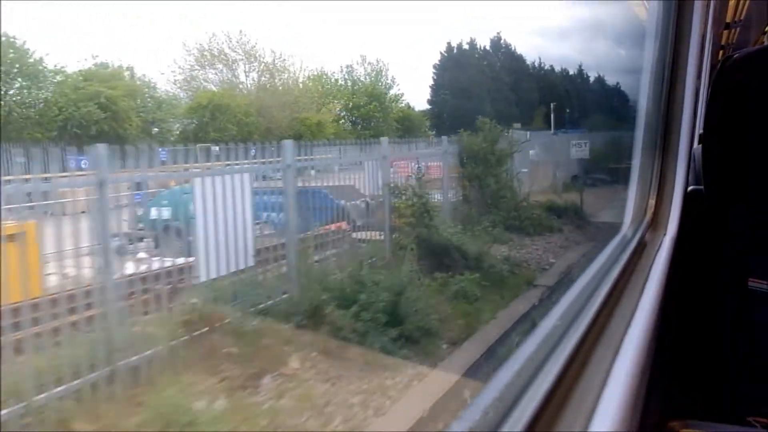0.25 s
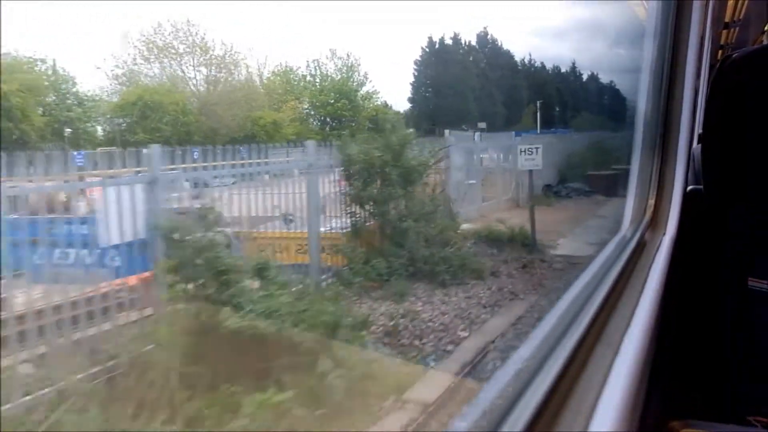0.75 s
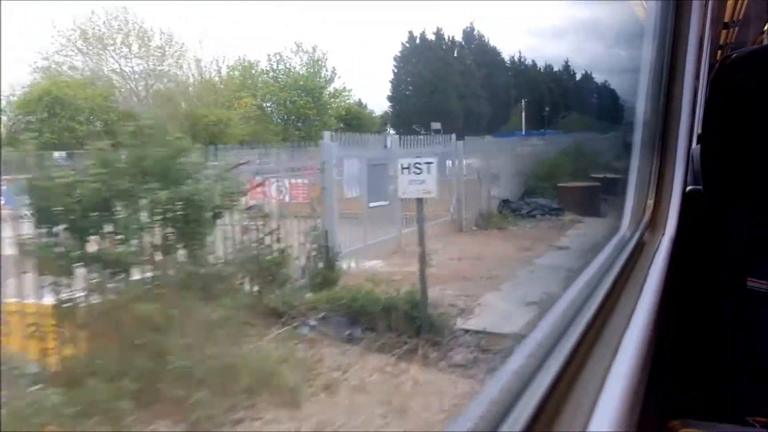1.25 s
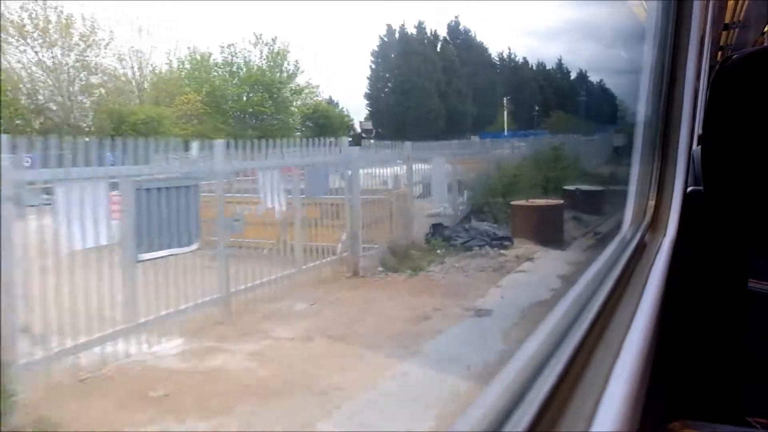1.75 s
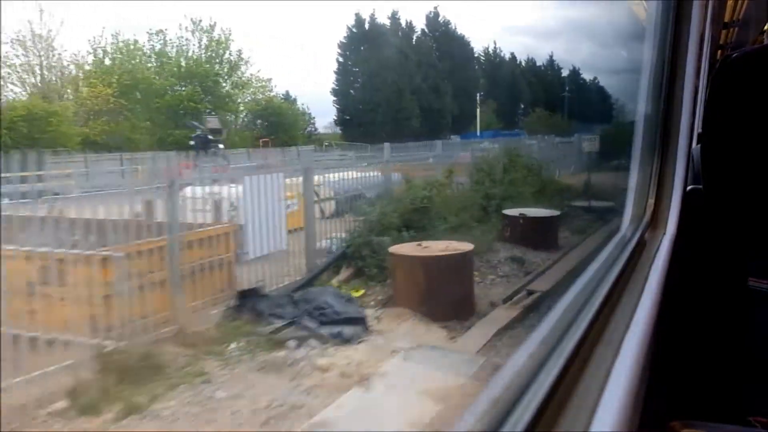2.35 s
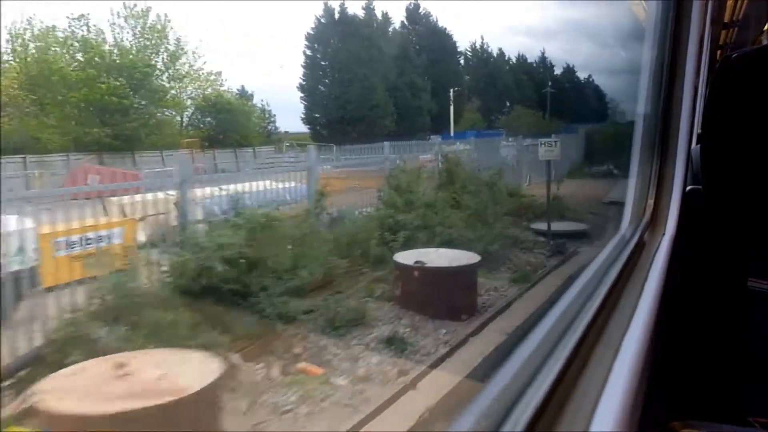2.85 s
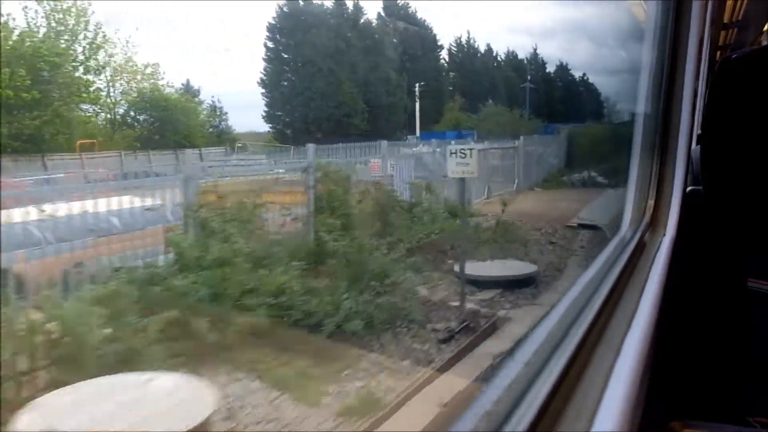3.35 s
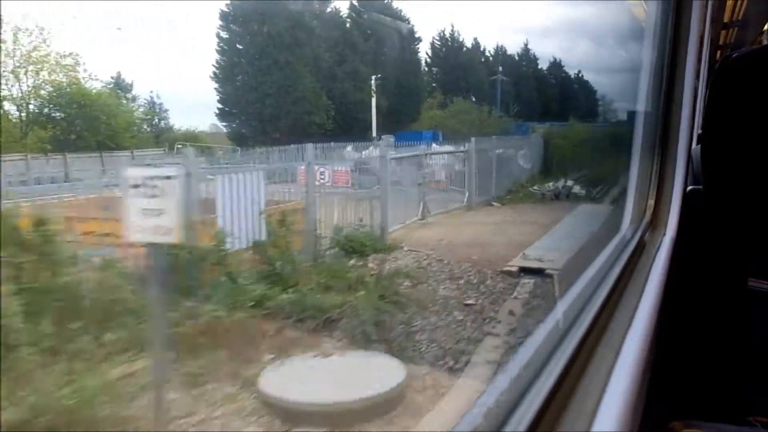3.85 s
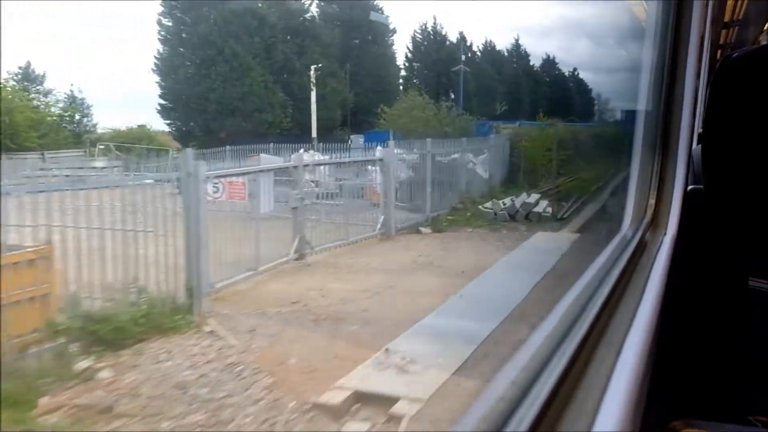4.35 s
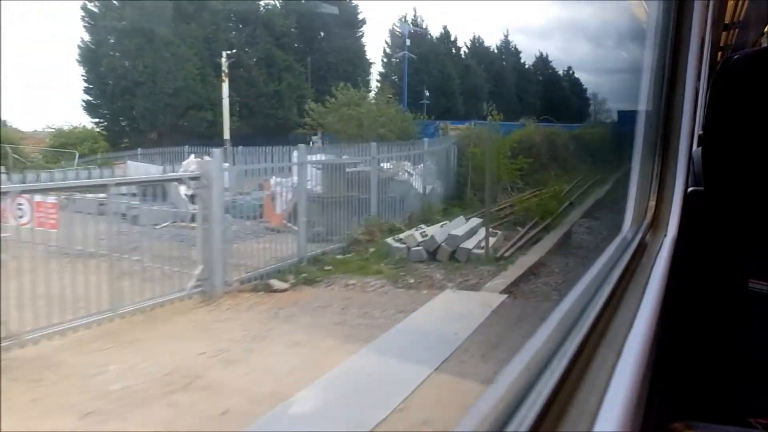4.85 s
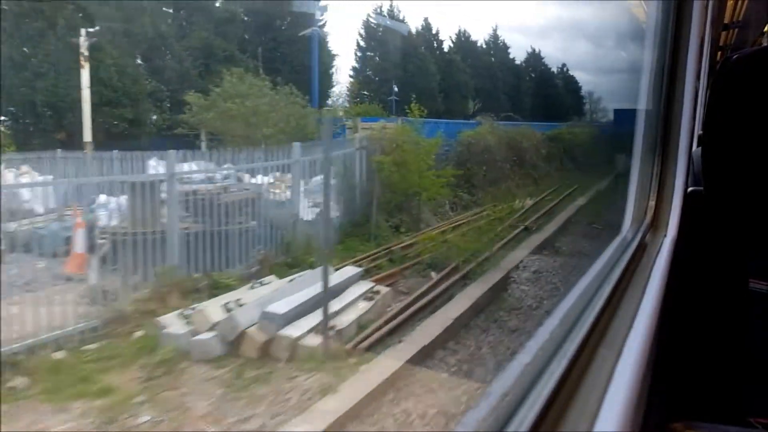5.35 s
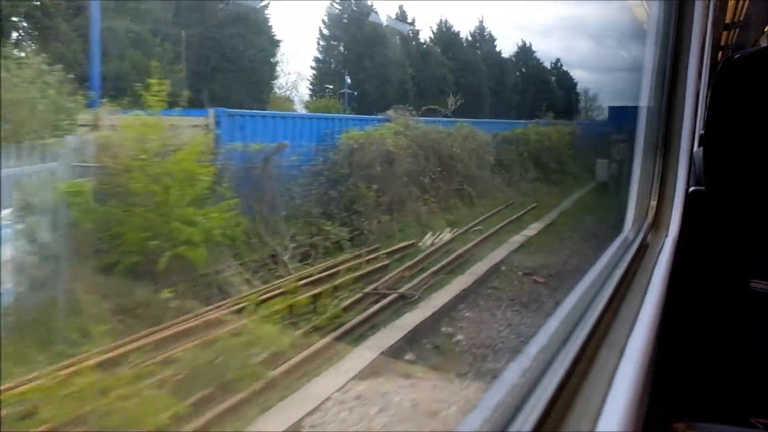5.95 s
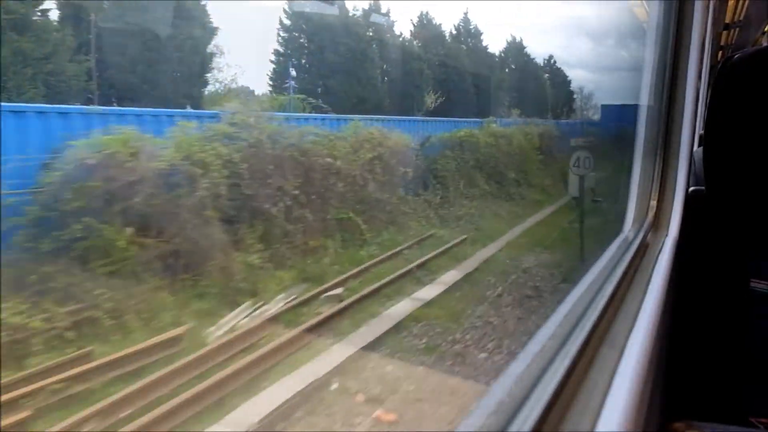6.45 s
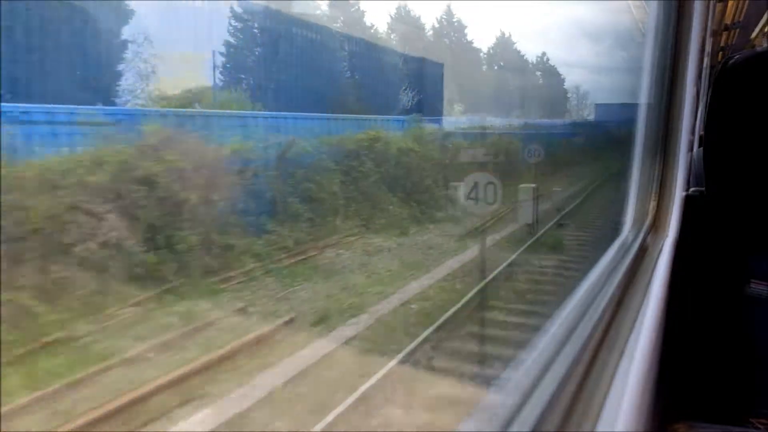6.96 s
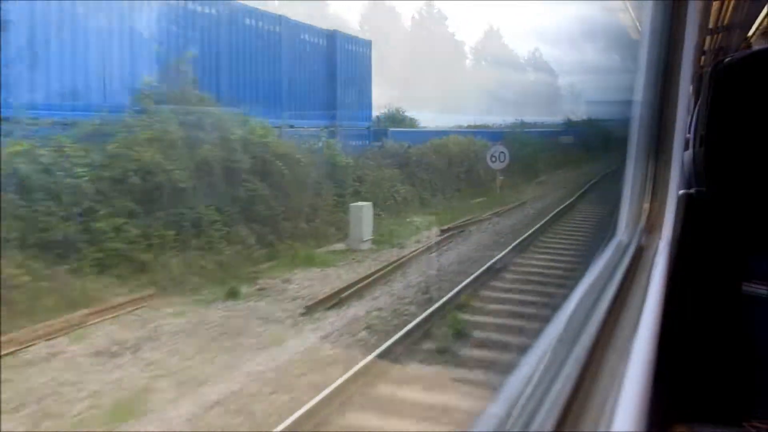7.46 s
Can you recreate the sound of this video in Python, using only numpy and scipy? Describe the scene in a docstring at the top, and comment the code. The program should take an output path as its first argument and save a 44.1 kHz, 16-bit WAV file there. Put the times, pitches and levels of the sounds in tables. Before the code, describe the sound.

Dense, bass-heavy cabin noise: a diesel engine under the floor thumps rapidly and hums, mixed with continuous wheel-and-rail roar. The boom beats at first, then steadies while light panel rattles and buzzes come and go. Faint high wheel singing and tiny ticks appear past the middle. Near the end comes a dry click and an abrupt rise in engine, rumble, rattles and thuds, heard from inside the carriage.

```python
"""Inside a diesel railcar at speed. From the start a six-cylinder engine under the floor thumps and drones as
summed tones, with a boom that beats at first; shaped noise makes the wheel rumble, and a gear whine climbs.
Loose trim buzzes and panels rattle in noise bursts; later a wheel sings faintly and small fittings tick.
Near the end, with a sharp click, the sound steps to a louder stretch of the ride with more thuds and ticks."""
import sys
import numpy as np
from scipy import signal
from scipy.fft import rfft, irfft
from scipy.io import wavfile

SR = 44100
rng = np.random.default_rng(int(sys.argv[2]) if len(sys.argv) > 2 else 0)


def store_wav(level_fs):
    """Save 16-bit WAV to argv[1]."""
    pcm = np.round(np.clip(np.atleast_2d(level_fs), -1, 1) * 32767)
    wavfile.write(sys.argv[1], SR, pcm.T.astype(np.int16))


N = 339570
T = np.arange(N) / SR
BINS = np.fft.rfftfreq(N, 1 / SR)
STEP_S = 6.304  # the loud stretch starts here
LOUD = np.clip((T - STEP_S) / .004, 0, 1)  # 0 in the quiet stretch, 1 in the loud one


def amp(db):
    """Turns decibels into a gain."""
    return 10 ** (np.asarray(db) / 20)


def unit(x):
    """Scales a signal to rms 1."""
    return x / np.sqrt(np.mean(x ** 2) + 1e-20)


def sine(turns):
    """A sine wave of rms 1 from a count of turns."""
    return np.sqrt(2) * np.sin(2 * np.pi * turns)


def curves(rows):
    """Draws each column of a table as a curve in time."""
    s, *columns = np.transpose(rows)
    return [np.interp(T, s, column) for column in columns]


def spectra(rows, hz):
    """Draws each column of a table along a log-frequency axis."""
    f, *columns = np.transpose(rows)
    return [np.interp(np.log(hz + 1), np.log(f + 1), column) for column in columns]


def drift(rate_hz, size=8192):
    """Slow random wander of rms 1."""
    a, b = rng.standard_normal((2, size))
    return unit(irfft((a + 1j * b) / (1 + (BINS[:size] / rate_hz) ** 4), N))


def band(hz, width_hz):
    """Noise gathered around one frequency, rms 1."""
    noise = rfft(rng.standard_normal(N))
    return unit(irfft(noise / (1 + (2 * (BINS - hz) / width_hz) ** 2), N))


def resonance(hz, centre_hz, width_hz):
    """Gain of one resonance, 1 at its centre."""
    return 1 / np.sqrt(1 + (2 * (hz - centre_hz) / width_hz) ** 2)


def soft_pulse(t, rise_s):
    """A bump that rises to 1 at rise_s, then dies away."""
    return t / rise_s * np.exp(1 - t / rise_s)


def add(mix, s, sound):
    """Mixes a sound in at time s."""
    part = mix[max(round(s * SR), 0):][:len(sound)]
    part += sound[:len(part)]


# engine cycles, one every two crank turns, sagging slowly under load: (t/s, f/Hz)
ENGINE_SPEED = [(0, 14.674), (4.1, 14.61), (6.3, 14.602), (6.35, 14.575), (7.7, 14.575)]
THUMP_S, LOUD_THUMP_S = .0411, 6.3487  # first thump of the quiet and of the loud stretch


def engine_cycles():
    """Counts engine cycles, turning a little unevenly; each thump falls on a whole number."""
    unsteady = (.0003 + .0009 * LOUD) * drift(7.)
    cycles = np.cumsum(curves(ENGINE_SPEED)[0] * (1 + unsteady)) / SR
    cycles = cycles - np.interp(THUMP_S, T, cycles)
    # the beat shifts at the step
    return cycles - (T >= STEP_S) * (np.interp(LOUD_THUMP_S, T, cycles) % 1)


# the firing tone and its harmonics: (t/s, order 6 level/dB, order 12 level/dB, order 18 level/dB)
FIRING_TONES = [(0, -31, -32, -25), (1.5, -31.5, -29.5, -26), (3, -32, -32, -27.5),
                (5.1, -31.5, -30.5, -26.5), (6.29, -32.5, -36.5, -26), (6.315, -29.5, -27, -22),
                (6.85, -29.5, -33.5, -17.5), (7.1, -26.5, -40.5, -20), (7.7, -26.5, -54, -22.5)]
# the boom, order 18, swells or dips briefly: (t/s, change of level/dB)
BOOM_CHANGES = [(.49, -0.5), (1.159, -1), (1.39, 3.5), (1.73, 5), (3.43, 6), (3.64, 3.5), (4.12, 5),
                (4.37, 0.5), (5.15, -8.5), (5.66, -10), (5.82, 5), (6.15, -4), (6.33, 2.5), (6.45, 3.5),
                (7.05, -7), (7.51, -7.5)]
SURGE_S = 0.03
# the boom throbs once a cycle, cresting shortly before the thump: depth (dB), place in the cycle (0-1)
THROB_DB, THROB_AT = 2.8, .78
# a weaker tone just above order 18 makes the boom beat, then fades
BEAT_HZ, BEAT_PEAK_S, BEAT_DB, BEAT_FADE_S = 7.2, .41, -34, 1


def engine_drone(cycles, flutter_db=0.46):
    """Six firings a cycle: the firing tone, its octave and the booming, beating third harmonic."""
    turns = [k * 6 * cycles + .08 * rng.standard_normal() for k in (1, 2, 3)]
    firing, octave, boom = curves(FIRING_TONES)
    boom = boom + THROB_DB * np.cos(2 * np.pi * (cycles - THROB_AT))
    boom = boom + sum(db * np.exp(-((T - s) / SURGE_S) ** 2) for s, db in BOOM_CHANGES)
    tones = sum(amp(db + flutter_db * drift(2.5)) * np.cos(2 * np.pi * turn)
                for turn, db in zip(turns, (firing, octave, boom)))
    beat_level = amp(BEAT_DB) / (1 + (T / BEAT_FADE_S) ** 8)
    beat = beat_level * np.cos(2 * np.pi * (turns[-1] + BEAT_HZ * (T - BEAT_PEAK_S)))
    return np.sqrt(2) * (tones + beat)


TIMING_ORDER = 56  # tone of the timing gears, in multiples of the engine cycle
# prominent engine orders: (multiple of the cycle, quiet level/dB, loud level/dB)
STRONG_ORDERS = [(2, -60, -44), (3, -48, -44), (4, -42, -37), (5, -49, -43), (7, -36, -30), (8, -44, -38),
                 (9, -40, -41), (10, -42, -37), (11, -53, -41), (13, -49, -53), (14, -46, -45),
                 (15, -38, -35), (16, -50, -47), (17, -53, -41), (19, -56, -52), (20, -42, -36),
                 (21, -41, -32), (22, -45, -47), (24, -43, -37), (26, -46, -45), (27, -55, -51),
                 (28, -38.5, -33), (29, -55, -51), (30, -54, -53), (31, -55, -53), (36, -57, -48),
                 (42, -50, -45), (50, -55, -54), (61, -48, -54), (63, -51, -44), (66, -65, -48),
                 (67, -58, -50), (70, -55, -49), (75, -52, -50), (86, -60, -57), (88, -53, -49),
                 (103, -57, -52), (106, -62, -58), (112, -63, -54), (124, -63, -58)]
# rough level of the other orders, before a 1 dB cut and random scatter: (f/Hz, quiet level/dB, loud level/dB)
OTHER_ORDERS = [(15, -80, -70), (360, -63, -52), (470, -55, -53), (650, -58, -58), (830, -60, -55),
                (980, -59, -56), (1180, -66, -62), (1350, -68, -62), (1600, -68, -61), (1850, -71, -65),
                (2300, -82, -78), (3000, -87, -85)]


def engine_orders(cycles, size=8192, count=210):
    """A pressure wave repeats every cycle and thumps; each order wavers on its own as the load changes."""
    k = np.arange(1, count + 1)
    hz = k * np.mean(np.array(ENGINE_SPEED)[:, 1])
    named = np.array(STRONG_ORDERS)
    levels_db = np.array(spectra(OTHER_ORDERS, hz)) + 1.7 * rng.standard_normal(count) - 1
    levels_db[:, named[:, 0].astype(int) - 1] = named[:, 1:].T
    # the drone and the timing gears have functions of their own
    levels = amp(levels_db) * ~np.isin(k, (6, 12, 18, TIMING_ORDER))
    # one cylinder thumps harder: low orders arrive nearly together, the body scatters the high ones
    thump = (.92 + (hz / 380) ** 2) * rng.standard_normal(count)
    slow, fast = 2 * np.pi * rng.random((2, count))
    place = cycles % 1 * size
    out = np.zeros(N)
    for weight, phases in ((.94, thump), (.24 * drift(1.), slow), (.22 * drift(4.), fast)):
        spectrum = np.pad(levels * np.exp(1j * phases), ((0, 0), (1, 0)))
        waves = irfft(spectrum, size) * size / np.sqrt(2)
        # read the one-cycle wave at the engine's place in its cycle
        quiet, loud = (np.interp(place, np.arange(size + 1), np.append(w, w[0])) for w in waves)
        out += weight * (quiet * (1 - LOUD) + loud * LOUD)
    return out


# song of the timing gears: (t/s, level/dB)
TIMING_LEVEL = [(0, -40.5), (1, -42.5), (3.2, -42), (4.5, -44), (6.3, -43.5), (6.75, -43), (7.2, -41.5),
                (7.45, -51.5)]


def timing_gears(cycles, flutter_db=0.46):
    """The timing gears sing on one engine order."""
    return amp(curves(TIMING_LEVEL)[0] + flutter_db * drift(1.8)) * sine(TIMING_ORDER * cycles)


def belt_hum(cycles, order=19.42, level_db=-46.5):
    """A belt-driven auxiliary hums between the engine's orders."""
    return amp(level_db) * sine(order * cycles)


def saloon_boom(hz=276, width_hz=18, level_db=-40, rise_db=1.5):
    """Rumble rings in the saloon just above the drone and beats quickly against it."""
    return amp(level_db + rise_db * LOUD) * band(hz, width_hz)


def flutter(x, depth_db=0.82, sway_db=0.25, count=5):
    """Rough rail: each band of the roar flutters quickly and sways slowly on its own."""
    octaves = np.log2(BINS + 1)
    centres = np.log2(np.geomspace(500, 2800, count))
    spectrum = rfft(x)
    out = 0
    for share in np.eye(count):
        one_band = irfft(spectrum * np.interp(octaves, centres, share), N)
        out = out + one_band * amp(depth_db * drift(45.) + sway_db * drift(3.2))
    return out


def knock(cycles, depth=0.089, uneven=0.42, sharp=0.15, swell_db=0.4, count=6):
    """Loudness of the noise: a surge at each firing, uneven between cylinders, and a swell between thumps."""
    strength = 1 + uneven * unit(rng.standard_normal(count))
    firings = cycles * count
    surge = strength[firings.astype(int) % count] * np.exp(-(firings % 1) / sharp)
    pulses = 1 + depth * unit(surge - surge.mean())
    return unit(pulses * amp(-swell_db * np.cos(2 * np.pi * cycles)))


# wheel rumble and engine roar through the floor: (f/Hz, quiet level/dB per Hz, loud level/dB per Hz)
ROAR_COLOUR = [(12, -67, -67), (25, -63, -59), (33, -66, -58), (60, -61, -57), (140, -58, -53),
               (210, -60.5, -56), (310, -58.5, -53), (380, -66, -61), (480, -71.5, -69), (700, -72.5, -68),
               (980, -72, -67), (1200, -80, -76.5), (2100, -84.5, -79), (2800, -91.5, -86.5),
               (4300, -98.5, -95), (7000, -115, -109.5), (10600, -119, -113), (15000, -129, -123)]
# panel and air resonances that lift the roar: (f/Hz, width/Hz, lift/dB)
PANEL_LIFTS = [(277.1, 8.1, 8.5), (3450, 370, 4.5)]
# how alike the noise is on left and right: (f/Hz, coherence from 0 to 1)
LEFT_RIGHT_LIKENESS = [(20, .98), (300, .997), (1000, .96), (2000, .86), (4000, .8), (8000, .45),
                       (14000, .5)]


def roar(cycles, split_hz=480, swell_db=-0.03, hiss_flutter_db=1.05):
    """Rumble from the wheels below, noise pulsing with the cylinders above, both coloured by the panels."""
    a, b = rfft(rng.standard_normal((2, N))) * np.sqrt(SR / 2)
    same = np.clip(spectra(LEFT_RIGHT_LIKENESS, BINS)[0], -1, 1)
    pair = np.array([a, same * a + np.sqrt(1 - same ** 2) * b])
    upper = 1 / (1 + (split_hz / (BINS + 1)) ** 4)
    pulsing = rfft(flutter(irfft(pair, N)) * knock(cycles) * amp(hiss_flutter_db * drift(15.0)))
    lift_db = sum(db / (1 + (2 * (BINS - hz) / width) ** 2) for hz, width, db in PANEL_LIFTS)
    noise = (pair * (1 - upper) + pulsing * upper) * amp(lift_db)
    quiet, loud = (irfft(noise * amp(db), N) for db in spectra(ROAR_COLOUR, BINS))
    return (quiet * (1 - LOUD) + loud * LOUD) * amp(swell_db * drift(1.4))


# the hardest shakes of the floor panels, before shake_db: (t/s, level/dB)
PANEL_SHAKES = [(.496, -38), (.524, -37), (1.111, -39), (2.204, -40), (3.141, -38), (3.325, -38),
                (4.236, -37), (4.418, -42), (4.998, -38), (5.339, -39), (6.151, -36), (6.319, -34),
                (6.386, -32), (6.446, -31.5), (6.52, -30), (6.546, -34), (6.655, -31), (6.718, -29),
                (6.793, -28), (6.858, -30), (6.96, -36), (7.006, -28.5), (7.064, -29.5), (7.135, -35),
                (7.205, -35), (7.275, -30), (7.615, -34)]


def clatter(decay_s=0.0056, per_s=30, steady_db=-52, rise_db=8, shake_db=-2):
    """Floor panels shake in quick, uneven bursts over a light rattle that grows on the loud stretch."""
    hits = (rng.random(N) < per_s / SR) * amp(6 * np.minimum(rng.exponential(1, N), 2))
    t = np.arange(SR // 15) / SR
    rattle = unit(signal.oaconvolve(hits, np.exp(-t / decay_s))[:N])
    bursts = amp(steady_db + rise_db * LOUD) * rattle
    for s, db in PANEL_SHAKES:
        add(bursts, s, amp(db + shake_db) * soft_pulse(t, .008))
    # colour of the panels: (f/Hz, level/dB), rescaled to rms 1
    colour_db, = spectra([(120, -8.0), (350, 2.5), (550, 4.5), (800, 10.5), (1000, 8.5), (1250, -4),
                          (1900, -7.5), (3000, -21), (6000, -37.0), (15000, -66.5)], BINS)
    return irfft(rfft(bursts * rng.standard_normal(N)) * unit(amp(colour_db)), N)


# thuds from the wheels: (t/s, f/Hz, level/dB)
WHEEL_THUDS = [(3.162, 80, -25), (6.548, 115, -21), (6.614, 154, -17.5), (6.775, 169, -22),
               (7.29, 175, -23.5)]


def bumps(rise_s=0.0036):
    """The wheels meet uneven rail: short, dull thuds through the suspension."""
    t = np.arange(SR // 8) / SR
    out = np.zeros(N)
    for s, hz, db in WHEEL_THUDS:
        add(out, s, amp(db) * soft_pulse(t, rise_s) * np.sin(2 * np.pi * hz * t))
    return out


# gear teeth meeting in the final drive, climbing with road speed: (t/s, f/Hz)
TOOTH_PITCH = [(0, 576), (2.25, 626), (4.7, 679), (7.7, 738)]
# resonances of the gear case that swell the whine: (f/Hz, width/Hz, level/dB)
CASE_RESONANCES = [(601, 23, -40.5), (626, 10, -39.8), (651, 9, -50.5), (677, 12, -51.5), (735, 9, -41.5)]
WHINE_DB = -62.5  # between the resonances
# the shaft's throb grows as it nears a resonance of the floor
SHAFT_HZ, SHAFT_WIDTH_HZ, SHAFT_DB = 27.2, 2.7, -37


def drive_train(teeth_count=27):
    """Gear teeth whine as the train gathers speed; the unbalanced shaft throbs once a turn."""
    mesh_hz, = curves(TOOTH_PITCH)
    meshes = np.cumsum(mesh_hz + .3 * drift(6.)) / SR
    case_power = sum((amp(db) * resonance(mesh_hz, hz, width) ** 2) ** 2
                     for hz, width, db in CASE_RESONANCES)
    carried = np.sqrt(amp(WHINE_DB) ** 2 + case_power)
    whine = carried * amp(.5 * drift(5.)) * sine(meshes)
    shaft_gain = resonance(mesh_hz / teeth_count, SHAFT_HZ, SHAFT_WIDTH_HZ)
    return whine + amp(SHAFT_DB) * shaft_gain * sine(meshes / teeth_count)


# the hardest jolts that buzz the loose trim, before buzz_db: (t/s, level/dB)
TRIM_JOLTS = [(0.343, -59), (1.094, -61), (1.666, -62), (1.803, -61), (1.834, -59), (2.186, -62),
              (2.733, -62), (2.894, -61), (3.067, -61), (4.195, -60), (4.4, -59), (4.672, -60),
              (4.949, -62), (5.16, -64), (5.255, -61), (5.527, -57), (5.563, -62), (5.907, -59),
              (6.373, -56), (7.138, -56)]
# the kick comes a little over half a cycle after each thump; the trim is louder at each roll of the carriage
KICK_AT, ROLL_PEAK_S, ROLL_EVERY_S = .56, .36, .388


def trim(cycles, buzz_db=-8.5, buzz_s=0.007, chatter_db=-83, chatter_rise_db=4, kick_db=-76.5,
         kick_width=0.08, uneven_db=2.0, roll_db=2, hz=5700, width_hz=3000):
    """Loose trim chatters, is kicked once in every engine cycle, and buzzes briefly when jolted."""
    t = np.arange(SR // 8) / SR
    clumps = amp(5 * np.minimum(drift(20.), 2))
    kick_level = amp(kick_db + uneven_db * np.minimum(drift(8.), 1))
    kicks = kick_level * np.exp(-((cycles % 1 - KICK_AT) / kick_width) ** 2)
    roll = roll_db * np.cos(2 * np.pi * (T - ROLL_PEAK_S) / ROLL_EVERY_S)
    shake = (amp(chatter_db) * clumps + kicks) * amp(chatter_rise_db * LOUD + roll)
    for s, db in TRIM_JOLTS:
        add(shake, s, amp(db + buzz_db) * soft_pulse(t, buzz_s))
    contacts = unit(amp(3.5 * drift(500.)))
    # part of the noise is shared by both sides, part is each side's own
    rustle = unit(band(hz, width_hz) + np.array([band(hz, width_hz), band(hz, width_hz)]))
    return shake * contacts * rustle


# small hard ticks of the fittings: (t/s, level/dB, sizzle level/dB as the part settles)
FITTING_TICKS = [(4.4039, -60, -80), (4.8963, -58, -84), (4.9516, -54, -82), (5.162, -60, -73),
                 (5.3496, -46, -69), (5.558, -58, -75), (5.5923, -42, -68), (5.618, -54, -68),
                 (6.329, -45, -78), (6.621, -51, -84), (6.878, -46, -78), (7.0205, -41, -74),
                 (7.278, -55, -69), (7.351, -45, -63), (7.517, -53, -76), (7.5677, -38, -62)]
# what the fittings ring with: (f/Hz before a small random shift, relative level/dB, time to fall 60 dB/s)
FITTING_TONES = [(6600, -4, .01), (7500, 5, 0.016), (8600, 1.5, .016), (9600, -2.5, .012),
                 (10600, -3, .018)]


def ticks(tail_t60=0.17, scrape_db=-2, scrape_s=.012, grain_db=3):
    """Tiny hard contacts: the part scrapes, strikes, and settles with a grainy sizzle."""
    t = np.arange(SR // 5) / SR
    out = np.zeros((2, N))
    for channel in out:
        tail = np.zeros(N)
        for s, db, sizzle_db in FITTING_TICKS:
            ring = sum(amp(d - 60 * t / t60) * np.sin(2 * np.pi * hz * rng.uniform(0.93, 1.05) * t)
                       for hz, d, t60 in FITTING_TONES)
            contact = .17 * np.diff(rng.standard_normal(len(t)), prepend=0) * np.exp(-t / .002)
            add(channel, s + 0.0025, amp(db) * (ring / abs(ring).max() + contact))
            add(tail, s, amp(sizzle_db - 60 * t / tail_t60))
            # the scrape grows until the strike
            add(tail, s - t[-1], amp(sizzle_db + scrape_db) * np.exp(-t[::-1] / scrape_s))
        sizzle = unit(.6 * band(10500, 1500) + band(9500, 8000))
        channel += tail * sizzle * unit(amp(grain_db * drift(400.)))
    return out


def click():
    """One sharp, dry click where the sound steps up."""
    out = np.zeros(N)
    decay = np.exp(-np.arange(200) / SR / .00012)
    add(out, STEP_S, amp(-19) * np.convolve(decay, [.15, .7, .15]))
    return out


# a wheel sings on the curve, swelling and easing: (t/s, f/Hz, tone level/dB, rubbing halo level/dB)
WHEEL_SONG = [(0, 3320, -90, -77), (4.3, 3290, -82, -77), (4.68, 3280, -71, -74), (4.8, 3280, -73, -74),
              (4.96, 3283, -66, -73), (5.25, 3298, -66.5, -73), (5.35, 3315, -69, -72),
              (5.5, 3330, -60, -65.5), (5.6, 3330, -60.5, -65), (5.7, 3305, -66, -69),
              (5.9, 3315, -67, -68), (6.08, 3295, -66.5, -70), (6.26, 3322, -65, -70),
              (6.35, 3320, -90, -74)]


def wheel_ring():
    """The singing wheel: a wavering tone in a halo of rubbing noise."""
    hz, tone_db, halo_db = curves(WHEEL_SONG)
    tone = sine(np.cumsum(hz + 10 * drift(25.)) / SR)
    return amp(tone_db) * tone + amp(halo_db) * band(3335, 220)


def turbo_whistle(level_db=-84, rise_db=5):
    """A thin, slightly wavering turbo whistle, stronger on the loud stretch."""
    return amp(level_db + rise_db * LOUD) * sine(np.cumsum(5109 + 9 * drift(15.)) / SR)


# how far the sound leans to one side: (f/Hz, left minus right level/dB)
LEFT_LEAN = [(30, -2.5), (90, -2.5), (250, -1.9), (550, -2), (1100, -2), (2200, -1), (4500, 0.3),
             (12000, 0.3)]


def scene():
    """Engine orders and running noise swell together with the load; the low end leans to the right."""
    cycles = engine_cycles()
    # the engine dips for an instant as its beat shifts at the step
    dip = 1 - np.exp(-((T - STEP_S) / .0015) ** 2)
    # how strongly the floor carries the noise: (t/s, level/dB)
    load_db, = curves([(0, 0.67), (3, 0.4), (4.7, -0.89), (5.5, 0.32), (6.35, -1), (6.85, 0.92),
                       (7.25, -0.84), (7.7, -0.5)])
    tones = engine_drone(cycles) + timing_gears(cycles) + belt_hum(cycles)
    running = dip * engine_orders(cycles) + saloon_boom() + roar(cycles) + clatter() + bumps()
    mix = dip * tones + amp(load_db) * running + drive_train() + trim(cycles) + ticks()
    mix = mix + click() + wheel_ring() + turbo_whistle()
    lean_db = spectra(LEFT_LEAN, BINS)[0] / 2
    softened = mix * signal.windows.tukey(N, .001)  # very short fades at both ends
    return irfft(rfft(softened) * amp([lean_db, -lean_db]), N)


def record(dry, edge_hz=15400):
    """The microphone sheds the deepest rumble; then a filter removes the highest treble."""
    thinned = signal.sosfilt(signal.butter(2, 14, "highpass", fs=SR, output="sos"), dry)
    low_pass = signal.firwin(511, edge_hz, window=("kaiser", 9), fs=SR)
    return signal.oaconvolve(thinned, low_pass[None], "same")


dry = scene()
out = record(dry)
store_wav(out)
```